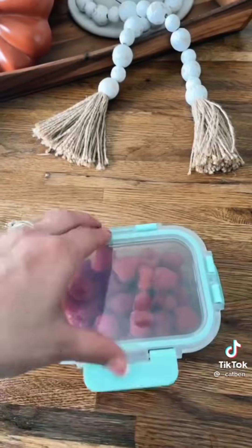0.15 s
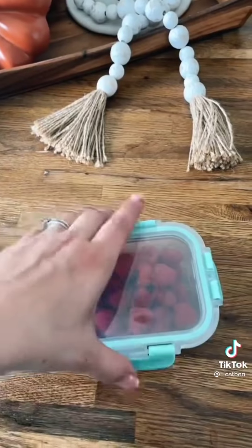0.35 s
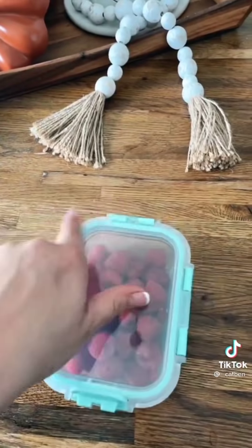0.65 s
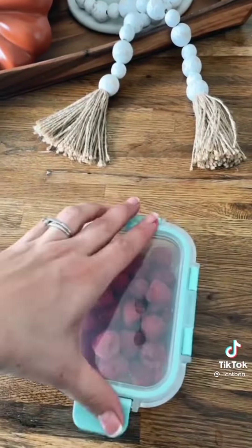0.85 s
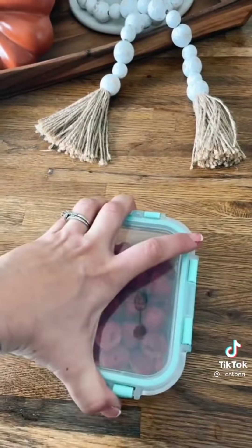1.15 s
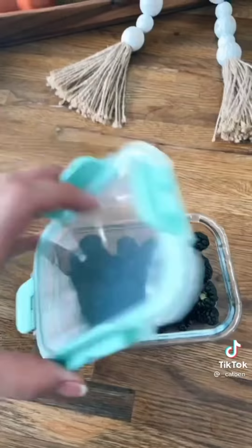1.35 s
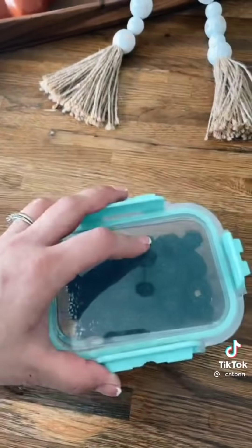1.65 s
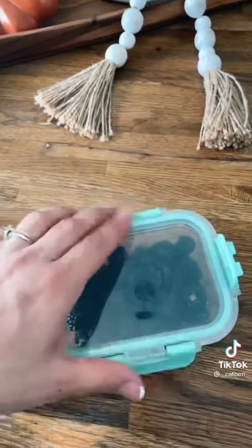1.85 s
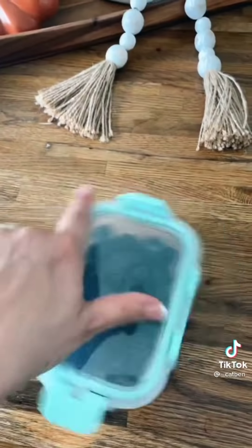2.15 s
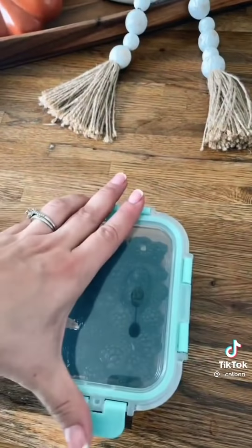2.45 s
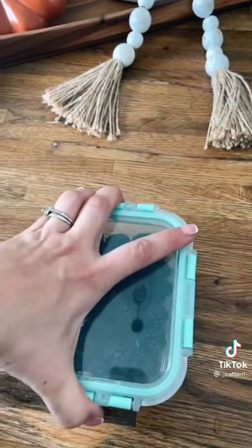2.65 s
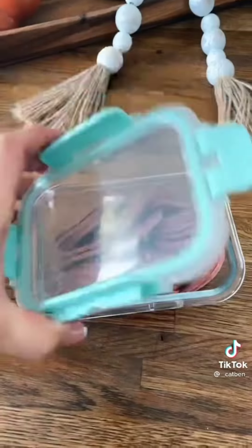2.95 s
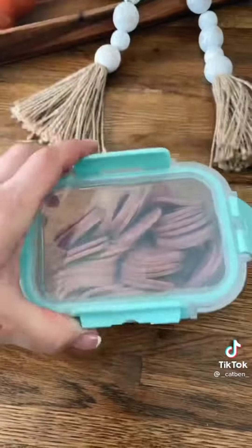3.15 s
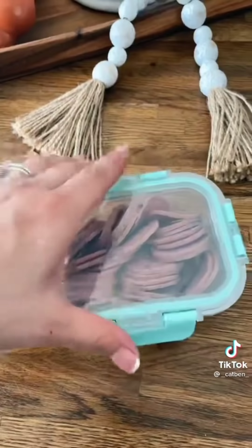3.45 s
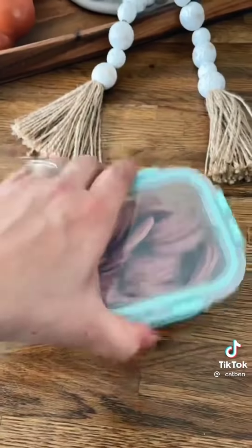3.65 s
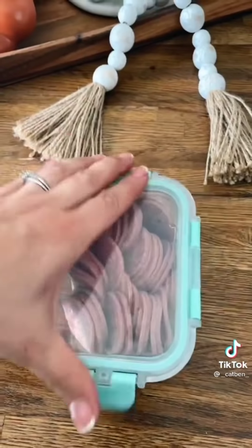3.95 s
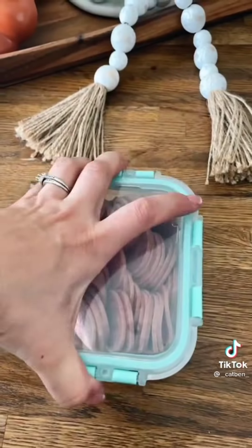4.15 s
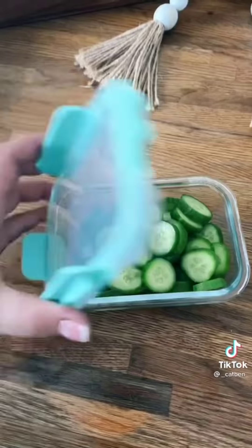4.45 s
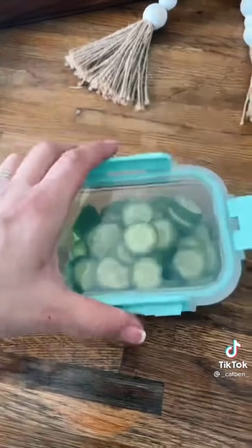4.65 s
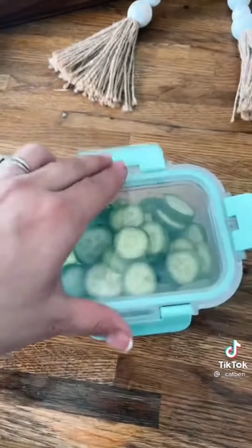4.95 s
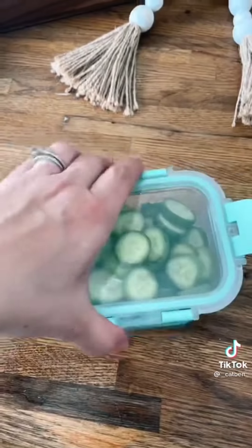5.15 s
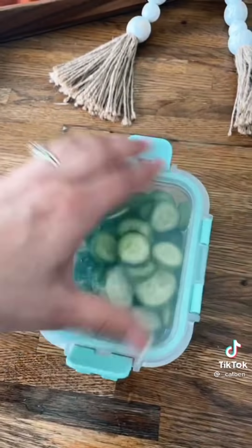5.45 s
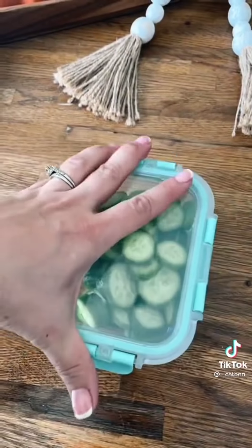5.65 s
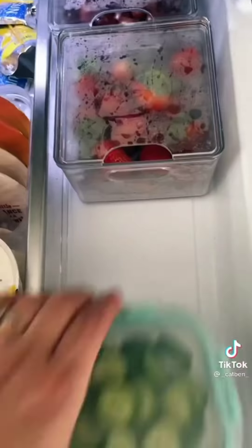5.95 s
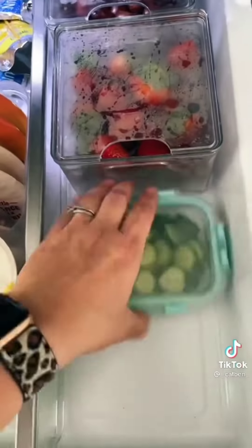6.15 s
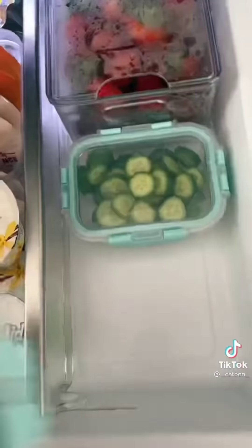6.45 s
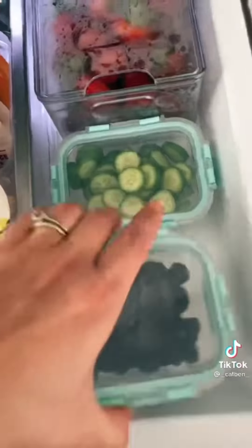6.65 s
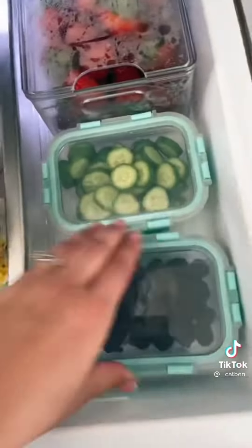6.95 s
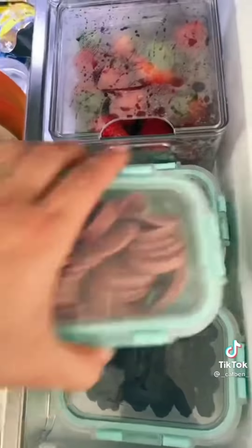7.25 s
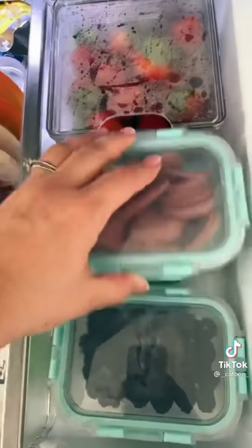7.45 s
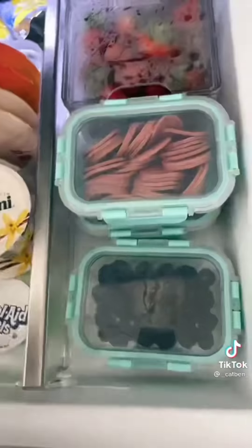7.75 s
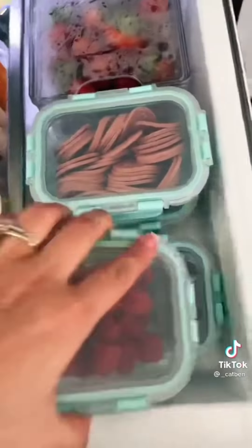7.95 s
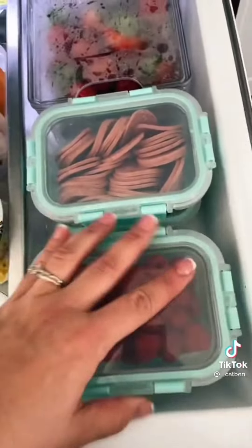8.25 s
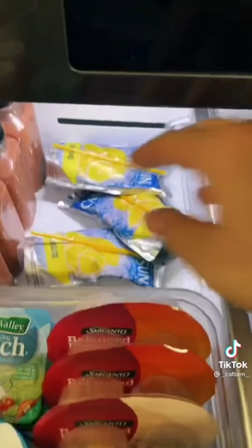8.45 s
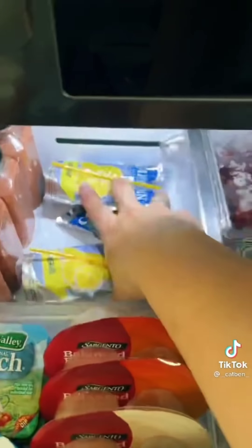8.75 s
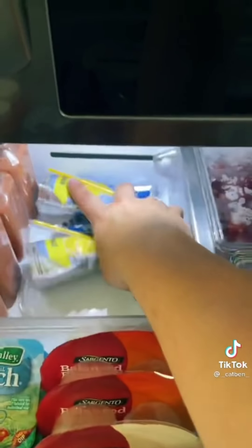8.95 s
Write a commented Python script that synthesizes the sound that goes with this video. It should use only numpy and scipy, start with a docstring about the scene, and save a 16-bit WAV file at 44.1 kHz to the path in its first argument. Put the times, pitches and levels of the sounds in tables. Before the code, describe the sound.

A close phone microphone in a small hard kitchen catches clipped shots separated by tiny silences, over low room rumble and faint skin-on-plastic hiss. From 0 to 1.3 seconds a lid is tapped and pressed, with strong latch snaps around 0.55 and 1.18. Soft taps follow at 1.5 to 1.7, then a bright glass clink near 1.97 and hard clicks at 2.17 and 2.75. Another lid taps at 3.2, clinks on glass at 3.54, and snaps loudly at 3.74 and 4.28. The next is lighter, with clicks near 5.3 and a double snap around 5.87. In the fridge drawer, duller hollow knocks land heavily at 6.3 and 7.0, a softer one at 7.6, and a firm group from 8.15 to 8.3. From 8.8 to 9.1, light bumps and thin crackling foil end abruptly.

```python
"""Small hard kitchen, close to a phone microphone: hands press and turn latching plastic lids on glass food
boxes on a wooden counter and snap the latches; boxes are stacked in a fridge drawer, foil pouches crinkle.
Blows are decaying modes driven by a tick; a noisy swell leads into each tick and dies after it. Skin and room
are filtered noise, foil is random snaps. Sparse echoes add the kitchen. Short edited shots, silence between."""
import sys
import numpy as np
from scipy import signal
from scipy.io import wavfile
from scipy.ndimage import uniform_filter1d

SR = 44100
rng = np.random.default_rng(int(sys.argv[2]) if len(sys.argv) > 2 else 0)


def waveform_to_disk(signal):
    """Save audio, clipped to [-1, 1], as 16-bit WAV at the path in sys.argv[1]."""
    frames = np.transpose(np.atleast_2d(signal))
    scaled = np.clip(frames, -1, 1) * 32767
    samples = np.round(scaled).astype(np.int16)
    wavfile.write(sys.argv[1], SR, samples)


N = 401310

# edited shots: start_s, end_s, background_start_db, background_end_db
SHOTS = [(0, 0.157, -50, -60), (0.222, 1.305, -54, -52), (1.427, 1.825, -65, -56.5),
         (1.891, 2.859, -51.5, -52.5), (2.971, 3.394, -71.5, -58.5), (3.455, 4.437, -50, -54.5),
         (4.564, 4.921, -61, -51.5), (5.009, 5.961, -65.5, -54), (6.074, 6.472, -49.5, -47),
         (6.588, 7.154, -74.5, -47.5), (7.282, 7.808, -72, -53), (7.894, 8.492, -51, -50.5),
         (8.59, 9.108, -72.5, -45.5)]
# room rumble spectrum: freq_hz, density_db_per_hz
RUMBLE_SPECTRUM = [(18, -35.5), (30, -1), (127, -3), (177, -6.5), (286, -10.5), (389, -10.5), (500, -15.5),
                   (1000, -22), (3000, -43), (3900, -77), (6600, -120)]
# skin-on-plastic hiss spectrum: freq_hz, density_db_per_hz
RUBBING_SPECTRUM = [(400, -22.5), (800, 0), (1500, -8), (3000, -13), (8000, -21), (13000, -22.5),
                    (16000, -34)]
# kitchen decay: freq_hz, t60_s
KITCHEN_DECAY = [(150, 0.47), (500, 0.26), (1500, 0.27), (4000, 0.31), (9000, 0.27), (15000, 0.06)]
# wall reflection spectrum: freq_hz, gain_db
WALL_SPECTRUM = [(100, -5.5), (1000, 0), (4000, -6), (10000, -7.5), (16000, -1.5)]
# foil pouches: time_s, crinkle_db
POUCH_LEVELS = [(8.8, -83.5), (8.854, -56), (9.024, -49.5), (9.034, -53), (9.1, -53)]
# foil snap spectrum: freq_hz, gain_db
FOIL_SPECTRUM = [(500, 0), (2500, 15.5), (6000, 9.5), (10000, 14.5), (15000, 12.5)]
# blows that ring the bare glass: time_s, level_db, tilt_db_per_octave
GLASS_CLINKS = [(0.0273, -35, -1.5), (0.3237, -37.5, -0.5), (1.96, -17.5, -8), (1.9815, -13.5, -1.5),
                (3.1951, -35, 10), (3.5404, -13, -1.5), (4.6486, -57, -5), (5.038, -32.5, -0.5),
                (5.1266, -33, -0.5)]
# glass box modes: freq_hz, level_db, t60_s
GLASS_MODES = [(2000, 0, .07), (3250, -7, .07), (3840, -6, .07), (5420, -13, .06), (6160, -11, .09),
               (8380, -13, .05), (10020, -16, .05), (12750, -22, .05), (14600, -16, .04)]
# boxes and pouches set down in the drawer: time_s, knock_db, thud_re_knock_db, snap_re_knock_db
DRAWER_BLOWS = [(6.115, -28.5, -3.5, -18.5), (6.212, -23, 0.5, -8.5), (6.29, -8, 1, -7),
                (6.325, -2.5, -9, -1.5), (6.335, -15.5, 4.5, -17.5), (6.989, -7.5, -3, -6.5),
                (7.032, -1, -11, -7.5), (7.477, -22.5, -7, -7.5), (7.551, -24, 6, -6.5),
                (7.62, -15, 4, -10), (8.148, -9.5, -2, -9.5), (8.234, -5, -8, -8.5), (8.31, -14, -2, -6.5),
                (8.383, -31.5, -12, -12), (8.775, -47.5, -13, -10), (8.891, -34.5, -1.5, -1),
                (8.96, -31, -2, 1.5), (9.007, -32, 6.5, 5), (9.016, -21.5, 1, 3.5), (9.06, -25.5, -19, -10),
                (9.068, -25.5, -6, -9), (9.093, -30, -12, 1)]
# plastic drawer, low modes: freq_hz, level_db, t60_s
DRAWER_LOW_MODES = [(96, -1.5, 0.021), (134.2, -3, 0.04), (184.3, -8.5, 0.18), (252.7, -4, 0.032),
                    (310, -2.5, 0.045), (411.5, -1.5, 0.044)]
# plastic drawer, high modes: freq_hz, level_db, t60_s
DRAWER_HIGH_MODES = [(594, -7, 0.01), (816, -26.5, 0.026), (1029, -7.5, 0.0062), (1630, -12, 0.0074),
                     (1960, -12, 0.013), (2270, -5.5, 0.003), (3370, -11, 0.00092)]
# lids, latches and boxes on the counter: time_s, knock_db, thud_re_knock_db, snap_re_knock_db
COUNTER_BLOWS = [(0.031, -22.5, -10, -11), (0.267, -44, -5, 5.5), (0.326, -15, -2.5, 2.5),
                 (0.553, -5, -29, -4.5), (0.714, -34, 5.5, -32), (0.738, -34.5, -7, -12),
                 (0.94, -30.5, -1, 8), (1.126, -31.5, -17, -16), (1.166, -18, -16.5, -7.5),
                 (1.511, -44.5, -31, 1), (1.653, -26, -57, 0), (1.69, -28.5, -12.5, 2),
                 (1.914, -49, -1, 12.5), (1.949, -27.5, -16.5, 5.5), (1.961, -23.5, 5.5, 13),
                 (1.982, -12, -6.5, 2.5), (2.172, -0.5, -19, -6.5), (2.182, -13.5, -27, -20.5),
                 (2.576, -34, -9, -11.5), (2.694, -33.5, 5, 3.5), (2.718, -23.5, 4, -1),
                 (2.729, -4, -19, -2.5), (2.768, -1.5, -38.5, -5.5), (3.054, -54, -11, -8),
                 (3.133, -45.5, -11.5, -12), (3.196, -14.5, -11.5, 3), (3.54, -13.5, -8, 8),
                 (3.737, -1, -14, -2), (3.752, -12, -6.5, -19), (3.884, -27.5, -2.5, -9.5),
                 (4.051, -30, 9, 16.5), (4.122, -17, -12, 5), (4.28, 0.5, -35.5, -2.5),
                 (4.645, -43.5, -12, -22), (5.034, -35, -7, 9.5), (5.128, -31, -45, 7.5),
                 (5.304, -9.5, -25.5, -4.5), (5.621, -36, -2.5, 13), (5.691, -27.5, 1, 4),
                 (5.731, -30.5, -2.5, 0), (5.861, -8.5, -32, -7), (5.88, -8.5, -29.5, -2)]
# blows in a longer, noisier burst: time_s, knock_db, thud_re_knock_db, snap_re_knock_db, extra_swell_db
NOISY_BLOWS = [(0.541, -6.5, -9, -4, 5), (0.678, -31, 6, -4, 7.5), (1.181, -4.5, -17.5, -6.5, 6),
               (2.273, -30.5, 1.5, -5, 12), (2.521, -43.5, 5.5, -27.5, 5.5), (3.48, -37.5, -5, 11.5, 10.5),
               (3.848, -24, -20, -6, 7.5), (4.79, -26.5, -9.5, 7, 8), (5.393, -42, -0.5, 5, 10)]
# closed box with lid, low modes: freq_hz, level_db, t60_s
BOX_LOW_MODES = [(221, -1, 0.057), (334, 5.5, 0.049), (444, 7, 0.033), (520, 4, 0.032)]
# closed box with lid, high modes: freq_hz, level_db, t60_s
BOX_HIGH_MODES = [(609, -3.5, 0.0071), (810, -11.5, 0.015), (1000, -0.5, 0.0038), (1210.5, -9, 0.018),
                  (1435, -10.5, 0.0032), (1880, -4.5, 0.019), (2384, -12, 0.019), (3240, -12, 0.002)]
# hard plastic snap spectrum: freq_hz, gain_db
SNAP_SPECTRUM = [(1500, -13), (2800, 5), (4100, 14.5), (5500, 10), (8000, 3.5), (12000, 0), (15500, -4)]

# hiss level at the usual background level, and its slope against background
USUAL_BACKGROUND_DB, RUBBING_DB, RUBBING_DB_PER_DB = -51.5, -66.5, 2.6
KITCHEN_DB = -15
# a heavier blow brightens the knock
TILT_DB_PER_OCTAVE, TILT_PER_THUD_DB = -2.5, 0.13
# the weaker the snap, the stronger the noisy swell
SWELL_DB, SWELL_PER_SNAP_DB = -4, -.15
LEAD_S = .04  # noise before the tick
THUD_LAG_S = .003  # the heavy body answers after the tick
FADE_S, EDGE_HZ = 0.014, 16450


def amp(db):
    """Decibels to gain."""
    return 10 ** (np.asarray(db) / 20)


def evened(x):
    """Scales to rms 1."""
    return x / np.sqrt(np.mean(x ** 2) + 1e-20)


def peaked(x):
    """Scales to peak 1."""
    return x / (abs(x).max() + 1e-20)


def read(points, hz):
    """Interpolates a table on a log-frequency axis."""
    table_hz, value = np.transpose(points)
    return np.interp(np.log(hz + 1), np.log(table_hz + 1), value)


def add(mix, time_s, sound):
    """Mixes a sound in at time_s, cropped to the mix."""
    at = round(time_s * SR)
    part = mix[max(at, 0):][:len(sound) + min(at, 0)]
    part += sound[max(-at, 0):][:len(part)]


def coloured(x, points):
    """Causal minimum-phase filter with the given dB spectrum."""
    gain_db = np.maximum(read(points, abs(np.fft.fftfreq(4096, 1 / SR))), -100)
    log_gain = np.log(amp(gain_db))
    taps = np.fft.ifft(np.exp(signal.hilbert(log_gain).conj())).real[:2048]
    return signal.oaconvolve(x, taps)[:len(x)]


def background():
    """Low room rumble and lumpy hiss of skin on plastic, drifting in level over each shot."""
    shots = np.array(SHOTS)
    level_db = np.interp(np.arange(N) / SR, shots[:, :2].ravel(), shots[:, 2:].ravel())
    lumps = evened(uniform_filter1d(rng.standard_normal((2, N)), 900))
    rumble = evened(coloured(rng.standard_normal(N), RUMBLE_SPECTRUM)) * amp(1.6 * lumps[0])
    rubbing = evened(coloured(rng.standard_normal(N), RUBBING_SPECTRUM)) * amp(1.2 * lumps[1])
    # the hiss follows the background more steeply
    rubbing_db = RUBBING_DB + RUBBING_DB_PER_DB * (level_db - USUAL_BACKGROUND_DB)
    return amp(level_db) * rumble + amp(rubbing_db) * rubbing


def kitchen(x):
    """Sparse reflections of random sign, each band dying at its own speed."""
    taps = np.zeros(SR)
    at = np.arange(120, SR - 20, 20)
    taps[at + rng.integers(0, 20, len(at))] = rng.choice([-1., 1.], len(at))
    hz, t, bands = signal.stft(taps, SR, nperseg=256)
    decay = amp(-60 * t / read(KITCHEN_DECAY, hz)[:, None])
    tail = signal.istft(bands * decay, SR, nperseg=256)[1]
    tail = coloured(tail, WALL_SPECTRUM)
    return signal.fftconvolve(x, tail / np.linalg.norm(tail))[:N]


def pouches():
    """Foil buckles in many tiny snaps of unequal size, coming in clumps."""
    time_s, crinkle_db = np.transpose(POUCH_LEVELS)
    t = np.arange(time_s[0], time_s[-1], 1 / SR)
    clumps = evened(uniform_filter1d(rng.standard_normal(len(t)), 400))
    fires = rng.random(len(t)) < 15000. / SR  # 15000 snaps per second
    snaps = fires * rng.standard_normal(len(t)) * amp(1.2 * rng.exponential(1, len(t)))
    crinkle = coloured(snaps * amp(3.5 * clumps), FOIL_SPECTRUM)
    mix = np.zeros(N)
    add(mix, time_s[0], amp(np.interp(t, time_s, crinkle_db)) * evened(crinkle))
    return mix


def ring(modes, detune, place_db, size=12000):
    """Decaying sines; the place of the blow shifts, weights and may flip each mode."""
    hz, db, t60_s = np.transpose(modes)[:, :, None]
    shift, weight, side = rng.standard_normal((3, len(modes), 1))
    t = np.arange(size) / SR
    swing = np.sign(side) * np.sin(2 * np.pi * hz * (1 + detune * shift) * t)
    return (amp(db + place_db * weight - 60 * t / t60_s) * swing).sum(0)


def tick(swell_db, ragged_db, ragged_ms=1.0, spread_ms=10.3, size=5000):
    """A tick with a ragged end; a noisy swell leads into it and dies after it, longer when strong."""
    ms = 1000 * (np.arange(size) / SR - round(LEAD_S * SR) / SR)
    grit = rng.standard_normal(size) * amp(5.0 * rng.standard_normal(size))
    width_ms = spread_ms * amp(.25 * swell_db)
    swell = grit * np.exp(-(ms / width_ms) ** 2 / 2)
    swell = amp(swell_db) * swell / np.linalg.norm(swell)
    ragged = grit * np.exp(-abs(ms) / ragged_ms) * (ms > 0)
    ragged = amp(ragged_db) * ragged / np.linalg.norm(ragged)
    return (ms == 0) + ragged + swell


def clink(tilt_db):
    """A harder blow favours high glass modes; weak, slower neighbours of each leave a rough shimmer."""
    modes = [(hz, db + tilt_db * np.log2(hz / GLASS_MODES[0][0]), t60_s) for hz, db, t60_s in GLASS_MODES]
    neighbours = 5 * [(hz, db - 16, 3.1 * t60_s) for hz, db, t60_s in modes]  # five copies, each detuned
    shimmer = ring(neighbours, detune=.012, place_db=1.5)
    blow = tick(-2.0, ragged_db=-20.5)
    return peaked(signal.fftconvolve(blow, ring(modes, detune=0.0015, place_db=0.0) + shimmer))


def hit(knock_db, thud_db, snap_db, low_modes, high_modes, extra_swell_db=0):
    """A tick drives low modes, crowded high modes and a bare plastic snap; low modes get the least noise."""
    tilt_db = TILT_DB_PER_OCTAVE + TILT_PER_THUD_DB * thud_db
    swell_db = SWELL_DB + SWELL_PER_SNAP_DB * snap_db + extra_swell_db
    low_drive, high_drive, snap_drive = (np.pad(tick(swell_db + more_db, ragged_db), (0, 7000))
                                         for more_db, ragged_db in [(-4.0, -16.0), (0.5, -1.0), (2.0, 2.0)])

    body = ring(low_modes, detune=0.028, place_db=2.0)
    thud = peaked(signal.fftconvolve(low_drive, body)[:len(low_drive)])
    thud = np.roll(thud, round(THUD_LAG_S * SR))

    tilted = [(hz, db + tilt_db * np.log2(hz / 1200.), t60_s) for hz, db, t60_s in high_modes]
    panels = ring(10 * tilted, detune=0.1, place_db=1.5, size=3000)  # ten detuned copies of each mode
    knock = peaked(signal.fftconvolve(high_drive, panels)[:len(high_drive)])
    # small panels radiate little bass
    knock = signal.sosfilt(signal.butter(2, 450., "high", fs=SR, output="sos"), knock)

    snap = peaked(coloured(snap_drive, SNAP_SPECTRUM))
    return amp(knock_db) * (knock + amp(thud_db) * thud + amp(snap_db) * snap)


def boxes():
    """Every blow on the counter and in the drawer, and the ringing glass."""
    mix = np.zeros(N)
    for time_s, *blow in COUNTER_BLOWS:
        add(mix, time_s - LEAD_S, hit(*blow, BOX_LOW_MODES, BOX_HIGH_MODES))
    for time_s, *blow, extra_swell_db in NOISY_BLOWS:
        add(mix, time_s - LEAD_S, hit(*blow, BOX_LOW_MODES, BOX_HIGH_MODES, extra_swell_db))
    for time_s, *blow in DRAWER_BLOWS:
        add(mix, time_s - LEAD_S, hit(*blow, DRAWER_LOW_MODES, DRAWER_HIGH_MODES))
    for time_s, level_db, tilt_db in GLASS_CLINKS:
        add(mix, time_s - LEAD_S, amp(level_db) * clink(tilt_db))
    return mix


def scene():
    """Near sources, their reflections and the background."""
    near = boxes() + pouches()
    return (near + amp(KITCHEN_DB) * kitchen(near) + background())[None]


def record(dry):
    """Microphone bass cut, shot edits, rounded peaks, band limit."""
    t = np.arange(N) / SR
    heard = signal.sosfilt(signal.butter(3, 100., "high", fs=SR, output="sos"), dry)
    edit = (t < SHOTS[0][1]) * 1.  # the first shot has no fade-in
    for start_s, end_s, *_ in SHOTS[1:]:
        edit += np.clip((t - start_s) / FADE_S, 0, 1) ** 2 * (t < end_s)  # quick fade-in, hard cut
    rounded = 0.96 * np.tanh(heard / 0.8)
    lowpass = signal.firwin(1023, EDGE_HZ, window=("kaiser", 9), fs=SR)
    return signal.oaconvolve(rounded * edit, lowpass[None], "same")


dry = scene()
out = record(dry)
waveform_to_disk(out)
```